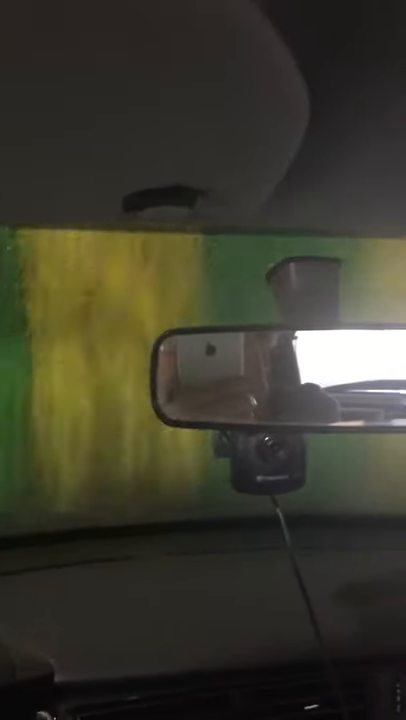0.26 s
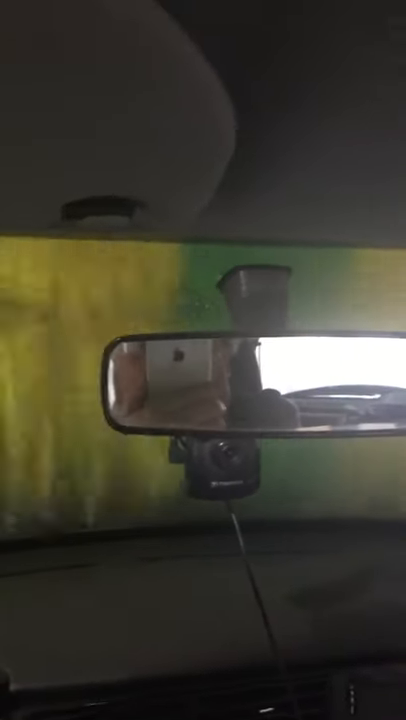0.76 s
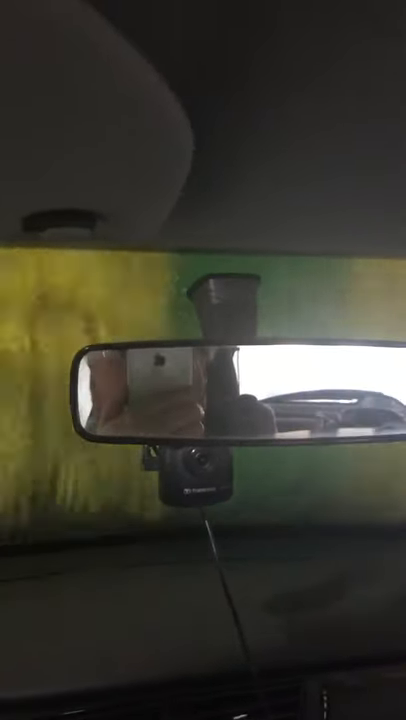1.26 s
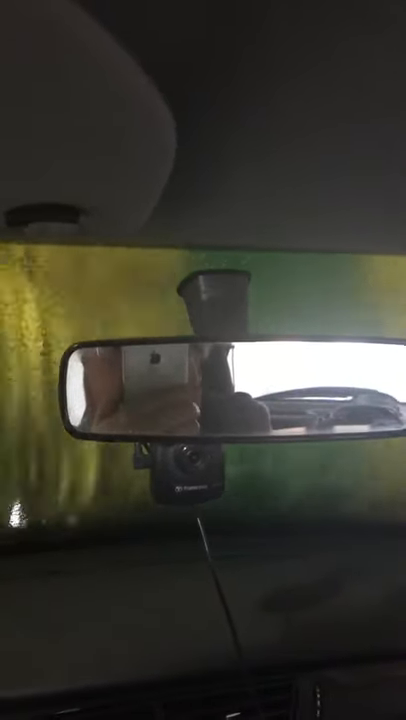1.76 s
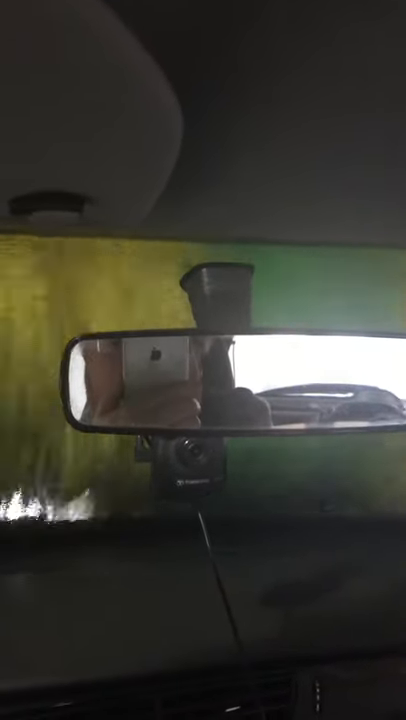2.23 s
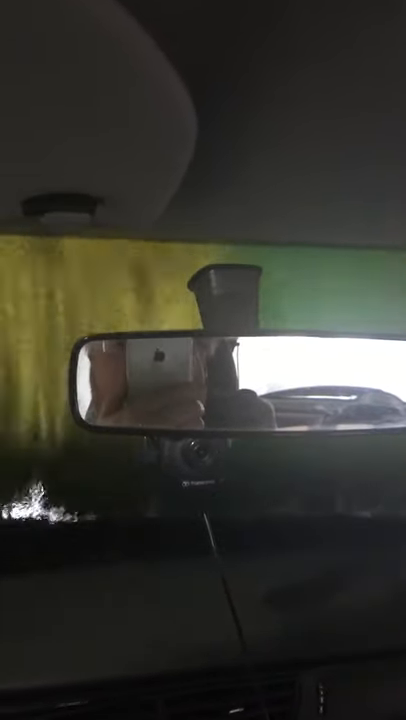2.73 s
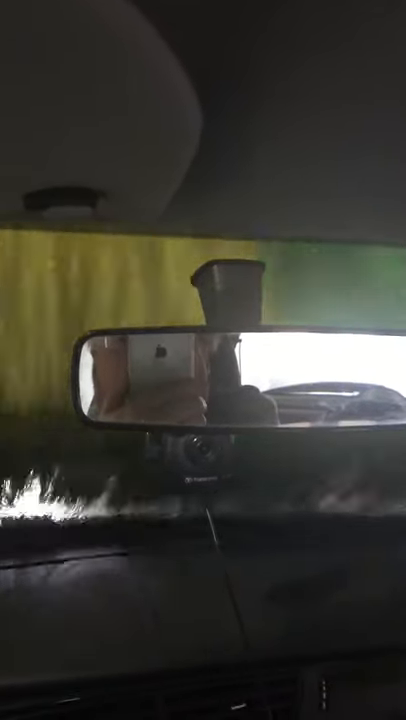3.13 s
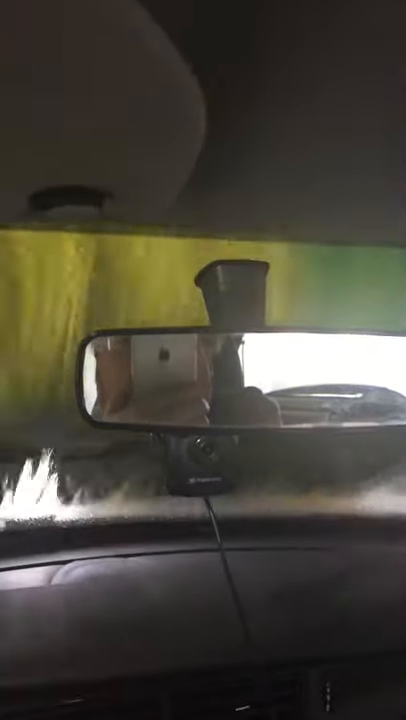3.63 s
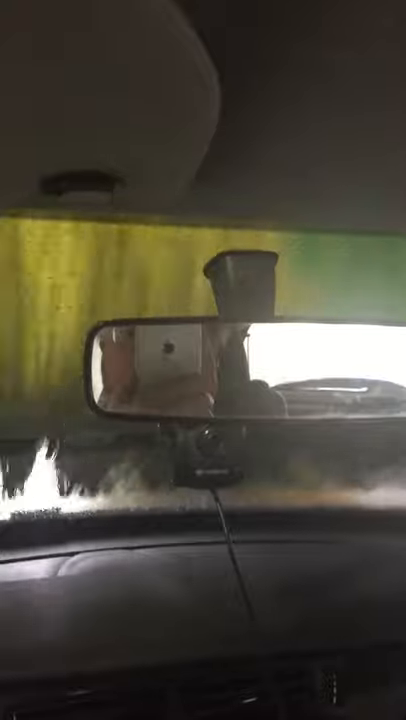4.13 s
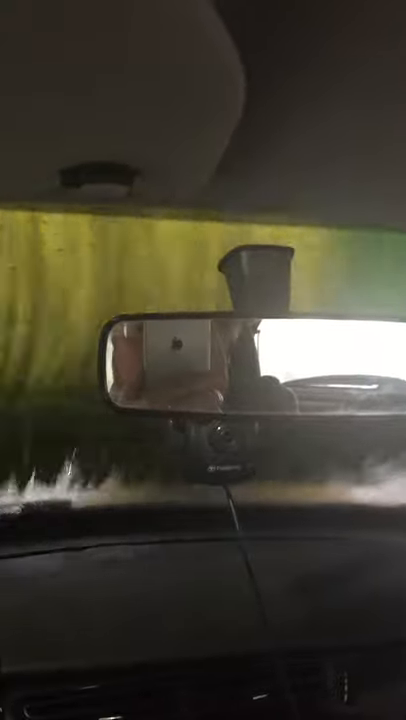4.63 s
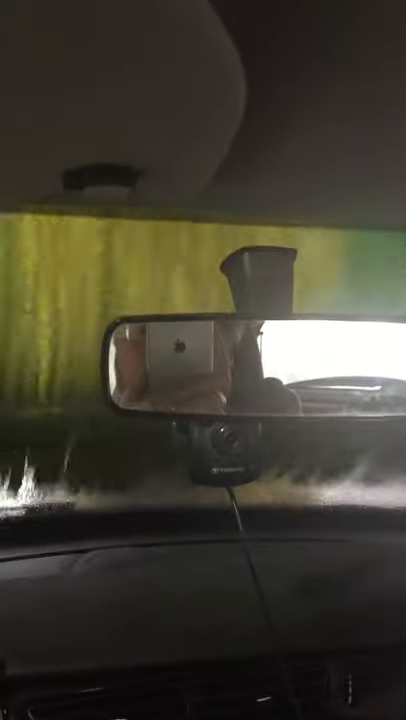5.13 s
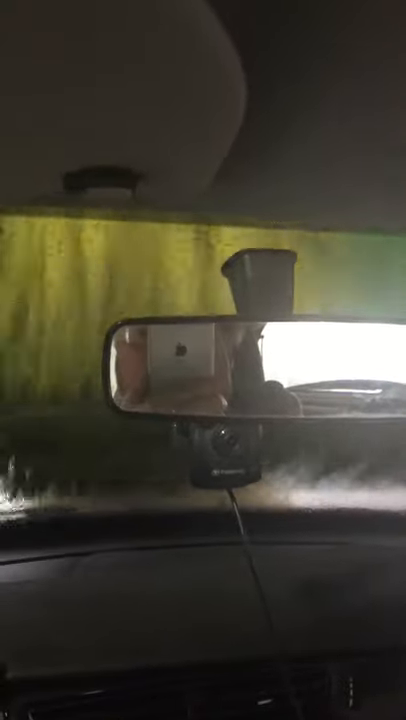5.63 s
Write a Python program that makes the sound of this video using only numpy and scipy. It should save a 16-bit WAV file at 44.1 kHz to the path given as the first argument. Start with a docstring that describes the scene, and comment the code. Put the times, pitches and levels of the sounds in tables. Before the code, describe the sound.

Heard from a front seat in a closed car: low rumble and a faint motor whine, then at about 1.4 seconds a spinning roller's wet strips slap and drum rapidly on the bonnet. Drumming grows deeper, water clicks and hiss build on the glass, and from 3.4 seconds a steady throbbing swish continues with thumps and slaps. Close, boxy, muffled mono sound.

```python
"""Inside a closed car in a wash bay: a spinning roller of wet foam strips lands on the bonnet and climbs the windscreen.
Coloured noise and dense contacts make the drumming, panel slap, swish and water, throbbing with the passing rows.
Noise bursts make slaps, ticks and spurts; decaying sines make thumps; ringing taps make patter, knocks and tinkling.
A faint motor whine precedes and meets the landing; low rumble and droning machinery lie behind. Cabin resonances
colour the noise layers, and a steep low-pass dulls everything."""
import sys
import numpy as np
from scipy import signal
from scipy.fft import rfft, irfft, next_fast_len
from scipy.io import wavfile

SR = 44100
rng = np.random.default_rng(int(sys.argv[2]) if len(sys.argv) > 2 else 0)


def dump_mix(stems):
    """Bounce the given channels to the path in sys.argv[1] as a 16-bit WAV at rate SR."""
    frames = np.atleast_2d(stems).T  # one column per channel
    limited = np.clip(frames, -1, 1)  # hard clip at full scale
    pcm = np.round(limited * 32767).astype(np.int16)
    wavfile.write(sys.argv[1], SR, pcm)


N = 259308

# layer levels before modulation: start_s, shell_drumming_db, glass_swish_db, water_hiss_db
ROLLER_LEVELS = [(0, -33, -49, -74), (.6, -38, -50.5, -71), (.9, -34.5, -50, -70.5),
                 (1.27, -37, -50, -71.5), (1.45, -30, -48, -68), (1.7, -28, -47, -68),
                 (2.08, -24.5, -42.5, -65.5), (2.2, -27, -44, -66), (2.65, -24, -38, -59),
                 (2.74, -27.5, -36, -57), (2.92, -26, -32.5, -51), (3.1, -23.5, -29, -50),
                 (3.33, -25.5, -28.5, -47), (3.365, -25, -30, -51.5), (3.6, -24, -29.5, -51),
                 (4.1, -23.5, -31.5, -55), (4.8, -24, -31, -54.5), (5.88, -24, -31, -54.5)]
# strip rows swept past: time_s, row_count
ROWS_PASSED = [(0, .5), (1.5, 34.53), (1.75, 40.56), (3.0, 69.63), (3.358, 77.45), (4.418, 101.45),
               (5.484, 125.45), (5.88, 134.4)]
CREST_S = 3.37    # the roller gets over the foot of the windscreen


def roller():
    """Strips drum, slap and swish amid water; the layers throb with the rows, most share brief level changes."""
    # relative noise colours: freq_hz, density_db
    shell_colour = [(53, -75), (90, -11.5), (118, -6.5), (145, -1.5), (177, 2), (236, -1.5), (286, -4),
                    (324, -6.5), (373, -12.5), (440, -14.5), (570, -16), (970, -120)]
    panel_colour = [(260, -23), (380, -3), (470, -16), (600, -1.5), (750, -1.5), (900, -4), (1050, -10),
                    (1300, -12), (1800, -16), (2600, -40), (3500, -57)]
    glass_colour = [(700, -4.5), (950, 1.5), (1150, 1.5), (1400, 3.5), (1550, 0), (1800, -1), (2300, -0.5),
                    (2700, -1.5), (3300, -2), (3700, -4), (4100, -9.5), (4500, -15), (5000, -24.5)]
    hiss_colour = [(4100, -19), (4500, 1), (4900, -1.5), (5600, 2.5), (6500, -3.5), (7300, -17.5),
                   (8000, -44)]
    spray_colour = [(6800, -6), (7400, -9.5), (8400, -5.5), (9500, -8), (10000, -8), (11500, -11),
                    (13000, -14), (15000, -18), (16000, -25)]
    crest_ring_colour = [(600, -23), (750, 2), (950, 2), (1100, -12), (1300, -25)]

    shell_db, glass_db, hiss_db = in_time(ROLLER_LEVELS)
    # panels follow the drumming and the swish; fuller on the thin bonnet and at the crest
    panel_db = -46.5 + 0.66 * (shell_db + 34) + 0.4 * (glass_db + 50)
    panel_db += 4.5 * bump(CREST_S, rise_s=0.12, fall_s=0.19)
    panel_db += 3 * bump(1.52, rise_s=0.22, fall_s=1)
    # fine spray follows the hiss, swells before the crest, drops sharply at it
    spray_db = -75.5 + 0.79 * (hiss_db + 71) - 5 * step(CREST_S, length_s=0.018)
    spray_db += 3 * bump(3.2, rise_s=.35, fall_s=.3)
    # beat starts at the landing, evens out slightly on the glass; each layer takes a share
    beat = 1.77 * step(1, length_s=.35) - 0.4 * step(CREST_S, length_s=.1)
    uneven = drift(24)
    change_db = brief_changes(rise_s=0.0073, fall_s=0.0059)

    shell = coloured(rng.standard_normal(N), shell_colour)
    shell *= from_db(shell_db + 0.3 * beat * row_beat(lag_rows=0.053))

    panel = coloured(contacts(per_s=9000, spread_db=2.0), panel_colour)
    panel_beat_db = 0.28 * beat * row_beat(lag_rows=0.028)
    panel *= from_db(panel_db + panel_beat_db + 0.24 * uneven + 0.44 * drift(10.3) + 1.4 * change_db)

    glass = coloured(contacts(per_s=12000, spread_db=2.0), glass_colour)
    glass = patchy(glass, 908, 4500, depth_db=1.18, pole_hz=12.0)
    glass_beat_db = 0.55 * beat * row_beat(lag_rows=0)
    glass *= from_db(glass_db + glass_beat_db + 0.19 * uneven + 0.64 * drift(45) + 1.2 * change_db)

    # hiss and spray are the same droplets; flying water partly fills the dips
    water = contacts(per_s=22000, spread_db=1.8)
    hiss = patchy(coloured(water, hiss_colour), 4400, 7500, depth_db=1.7, pole_hz=21.0)
    hiss_beat_db = 0.53 * beat * row_beat(lag_rows=.02)
    hiss *= from_db(hiss_db + hiss_beat_db + 0.56 * uneven + 0.8 * drift(33) + 0.68 * change_db)

    spray = patchy(coloured(water, spray_colour), 7000, 15000, depth_db=1.6, pole_hz=14.0)
    spray_beat_db = 0.69 * beat * row_beat(lag_rows=.04)
    spray *= from_db(spray_db + spray_beat_db + .3 * uneven + 0.61 * drift(30) + .4 * change_db)

    # upper panel ring peaks just before the crest
    crest_ring = coloured(contacts(per_s=3000, spread_db=1.5), crest_ring_colour)
    crest_ring *= from_db(-30 + change_db) * bump(3.33, rise_s=0.084, fall_s=.08)
    return shell + panel + crest_ring + glass + hiss + spray


def row_beat(lag_rows):
    """Beat of the passing rows: swells slowly, falls faster; swings about zero."""
    turn = 2 * np.pi * (in_time(ROWS_PASSED)[0] - lag_rows)
    return np.cos(turn) + 0.41 * np.sin(2 * turn)


def brief_changes(rise_s, fall_s):
    """Brief level changes in dB, mostly dips: listed ones first, then some recurring each turn of the roller."""
    # brief level changes as the roller works up the bonnet, mostly dips: time_s, change_db (before layer shares)
    bonnet_changes = [(1.465, -4), (1.505, -2), (1.548, 0), (1.628, -1), (1.716, -1), (1.803, -3),
                      (1.84, -3.5), (2.05, -5), (2.126, -7), (2.5, -3), (2.65, -3.5), (2.691, -4.5),
                      (3.309, -6.5)]
    # rows of the turn followed by a brief level change, mostly a dip: row_number
    turn_rows = [1, 5, 6, 8, 10]
    # level change after each of these rows: change_db (before layer shares)
    turn_changes = [-3.5, -7, -3.5, -1, 0.5]
    rows_per_turn, phase_rows = 12, .45

    s, rows = np.transpose(ROWS_PASSED)
    events = list(bonnet_changes)
    for first, db in zip(turn_rows, turn_changes):
        for row in np.arange(first, rows[-1], rows_per_turn):
            at_s = np.interp(row + phase_rows, rows, s)
            if at_s > bonnet_changes[-1][0]:
                events.append((at_s, db))
    return sum(db * bump(at_s, rise_s, fall_s) for at_s, db in events)


def thumps():
    """Bunches of strips thump the shell: a few sine cycles that swell and die."""
    # blows: start_s, envelope_peak_db, pitch_hz
    blows = [(1.52, -23, 185), (1.609, -17.5, 149), (1.677, -17, 187), (1.733, -13, 171), (1.78, -17, 182),
             (1.89, -17.5, 170), (2.064, -15, 164), (2.089, -16.5, 194), (2.487, -21, 175),
             (3.093, -20, 171), (3.208, -22, 177), (3.455, -22, 256), (3.604, -13.5, 184),
             (3.745, -18.5, 220), (3.99, -15, 195), (4.435, -16.5, 202), (4.597, -16, 141),
             (4.888, -18, 184), (5.136, -14.5, 154), (5.287, -18.5, 214), (5.416, -11, 196)]
    swell_s = 0.0048
    out = np.zeros(N + SR)
    s = np.arange(SR // 10) / SR
    shape = s / swell_s * np.exp(1 - s / swell_s)
    for at_s, db, hz in blows:
        out[round(at_s * SR):][:len(s)] += from_db(db) * shape * np.sin(2 * np.pi * hz * s)
    return out[:N]


def slaps():
    """Rows landing flat smack the sheet metal: a dull noise body and a brighter crack."""
    # smacks: start_s, body_level_db, crack_relative_db
    smacks = [(1.353, -35.5, -3), (1.470, -28, -12), (1.519, -36, -3), (1.554, -27.5, -9), (1.58, -37, -2),
              (1.607, -33, -14), (1.633, -30, -4), (1.675, -29.5, -6), (1.723, -27, -9), (1.762, -30, -5),
              (1.809, -30.5, -7), (1.86, -29, -13), (1.895, -35, -8), (1.988, -33, -10), (2.019, -28, -14),
              (2.067, -30, -16), (2.139, -28, -9), (2.232, -27, -16), (3.684, -35, -3), (3.902, -30, -7),
              (4.431, -32, -2), (4.966, -25, -7), (5.026, -26, -9), (5.109, -28, -3), (5.145, -20, -7),
              (5.492, -30, 1), (5.797, -24, -4)]
    dull = bursts([(s, db) for s, db, crack in smacks], 370, 920, t60_s=0.092, attack_s=.0004)
    crack = bursts([(s, db + crack) for s, db, crack in smacks], 960, 2200, t60_s=0.09, attack_s=.0008)
    return dull + crack


def patter():
    """Loose strip ends patter on the bonnet: dense random dull taps that bunch with the rows."""
    on = step(1.37, length_s=0.33) - step(2.2, length_s=0.33)
    taps = pings(600, 3.0, low_hz=495, high_hz=2260, t60_cycles=31.0, tilt_db=-2.0)
    return on * from_db(-43 + 3.0 * row_beat(lag_rows=.03)) * taps


def knocks():
    """Clumps of strip ends rap the windscreen; ringing taps whose level follows the swish."""
    level_db = in_time(ROLLER_LEVELS)[1] - 10 + 3.5 * drift(11)
    taps = pings(500, 2.9, low_hz=1020, high_hz=3460, t60_cycles=17.0, tilt_db=-0.07)
    return from_db(level_db) * step(CREST_S, length_s=.6) * taps


def ticks():
    """Drops and strip ends on the glass: a bright click, a duller knock under it and a thin top."""
    # clicks: start_s, bright_level_db, knock_relative_db, top_relative_db
    clicks = [(2.3248, -51, 11, -25), (2.606, -41, 1, -22), (2.6963, -41.5, 13.5, -22),
              (2.764, -48, 10, -25), (2.9025, -39, 8, -22), (2.9218, -35.5, 8, -18), (2.9474, -41, -1, -22),
              (2.972, -34, 5, -20), (3.0174, -40, -2, -14), (3.057, -40, 12, -11), (3.109, -33, -1, -28),
              (3.2094, -38, 0, -16), (3.245, -22, -5, -10), (3.2614, -39, -4, -12), (3.278, -42, 0, -10),
              (3.3107, -39, 16, -10), (3.331, -37, 0, -18), (3.346, -37, 5, -12)]
    bright = bursts([(s, db) for s, db, low, top in clicks], 3700, 9000, t60_s=0.015)
    knock = bursts([(s, db + low) for s, db, low, top in clicks], 2400, 4300, t60_s=0.026)
    thin = bursts([(s, db + top) for s, db, low, top in clicks], 9000, 16500, t60_s=.011)
    return bright + knock + thin


def tinkling():
    """Fine tinkling in the treble: random high rings whose level follows the water hiss."""
    level_db = in_time(ROLLER_LEVELS)[2] - 6.5
    return from_db(level_db) * pings(400, 1.8, low_hz=4600, high_hz=12500, t60_cycles=87.0, tilt_db=-1.57)


def splashes():
    """Spurts of water on the glass: soft bright noise bursts while the water builds."""
    # spurts: start_s, level_db
    spurts = [(1.475, -64), (1.64, -63), (1.725, -63), (1.765, -64), (1.812, -63), (1.85, -58),
              (1.897, -59), (1.975, -59), (2.03, -58), (2.062, -59), (2.085, -61), (2.14, -61),
              (2.235, -56), (2.28, -59), (2.325, -56), (2.42, -57), (2.51, -59), (2.70, -51), (2.78, -55),
              (2.84, -53)]
    return bursts(spurts, 4500, 9500, t60_s=0.12, attack_s=.004)


def motor():
    """Thin sine tones that fade in and out, wavering in level and a little in pitch."""
    # spells of whine: start_s, end_s, pitch_hz, level_db
    spells = [(-.1, .2, 865, -54), (0.57, 1.042, 868, -53.5), (0.733, 0.897, 536, -51),
              (.94, 1.04, 519, -50)]
    fade_s = 0.066
    out = np.zeros(N)
    for start_s, end_s, hz, db in spells:
        amplitude = np.sqrt(2) * from_db(db + 0.7 * drift(6.8))
        on = step(start_s, fade_s) - step(end_s, fade_s)
        phase = 2 * np.pi * np.cumsum(hz + 1.4 * drift(4.9)) / SR
        out += amplitude * on * np.sin(phase)
    return out


def rumble():
    """Low rumble in three noise bands, each with its own uneven level."""
    # band levels: time_s, low_db, boom_db, upper_db
    band_levels = [(0, -44, -43, -59), (.67, -51, -42, -51), (1.19, -46, -40, -52.5),
                   (1.6, -47, -37.5, -40.5), (2.0, -38.5, -31.5, -42.5), (2.2, -39, -33.5, -57),
                   (2.45, -41, -29, -34), (2.7, -34, -36, -34), (2.95, -40, -24, -47),
                   (3.15, -35.5, -33, -37), (3.4, -42, -29, -38.5), (3.75, -40, -44.5, -42),
                   (4.3, -40.5, -33.5, -40), (4.45, -41, -36, -39.5), (4.8, -37, -44, -35),
                   (5.15, -40, -29, -38), (5.35, -45, -41.5, -39), (5.55, -38, -28, -39),
                   (5.88, -38, -47, -47)]
    # relative noise colours: freq_hz, density_db
    low_colour = [(15, -39), (25, -30), (33, -20.5), (42, -10), (52, -3), (70, -5), (88, 2.5), (110, -41)]
    boom_colour = [(95, -25), (112, -0.5), (127, -5), (140, -7), (160, -38.5)]
    upper_colour = [(320, -33), (350, 7), (382, 13.5), (415, 0.5), (450, -18)]
    low_db, boom_db, upper_db = in_time(band_levels)
    low = coloured(rng.standard_normal(N), low_colour) * from_db(low_db)
    boom = coloured(rng.standard_normal(N), boom_colour) * from_db(boom_db)
    upper = coloured(rng.standard_normal(N), upper_colour) * from_db(upper_db)
    return low + boom + upper


def windscreen_ring():
    """A narrow noise band: the windscreen rings as the roller rides it."""
    # relative noise colour: freq_hz, density_db
    screen_colour = [(1150, -17), (1270, -1), (1340, 5), (1430, -4), (1550, -27)]
    return coloured(rng.standard_normal(N), screen_colour) * from_db(-46) * step(CREST_S, length_s=0.94)


def machinery():
    """Bay machinery drones behind the glass: a noise band that grows as the roller draws near."""
    # relative noise colour: freq_hz, density_db
    drone_colour = [(170, -26), (220, -1), (260, -1), (320, -7.5), (370, -12)]
    level_db = -48.5 + 9.5 * step(0.64, length_s=0.39)
    return coloured(rng.standard_normal(N), drone_colour) * from_db(level_db)


def coloured(x, spectrum):
    """Shape a signal by a spectrum and the resonances of shell and cabin; rms 1."""
    # resonances: centre_hz, width_hz, lift_db
    resonances = [(55.5, 7.6, 4), (128.6, 36, 4.5), (161.5, 56, 2.5), (199, 21, 1.5), (279.2, 23, 4.5),
                  (531, 110, 5.5), (661.6, 20, 5), (1318, 65, 4), (351, 28, 3.5), (431, 64, 2.5),
                  (2026, 87, 3.5), (2990, 450, 3), (3400, 42, 5.5), (6650, 270, 3.5), (10470, 500, -9.5)]
    size = next_fast_len(N)
    hz = np.arange(1, size // 2 + 2) * SR / size
    points = np.array(spectrum)
    level_db = np.interp(np.log(hz), np.log(points[:, 0]), points[:, 1], left=-120, right=-120)
    for centre_hz, width_hz, lift_db in resonances:
        level_db = level_db + lift_db / (1 + (2 * (hz - centre_hz) / width_hz) ** 2)
    return rms_one(irfft(rfft(x, size) * from_db(level_db), size)[:N])


def contacts(per_s, spread_db):
    """Random impulses of either sign and uneven size: many small contacts of strip and water; rms 1."""
    sizes = from_db(spread_db * np.minimum(rng.exponential(1, N), 5)) * rng.choice([-1, 1], N)
    return rms_one(sizes * (rng.random(N) < per_s / SR))


def patchy(x, low_hz, high_hz, depth_db, pole_hz):
    """Third-octave slices of a signal swell and sink each on their own; rms 1."""
    spectrum = rfft(x)
    hz = np.arange(len(spectrum)) * SR / N
    place = 3 * np.log2(np.clip(hz, low_hz, high_hz) / low_hz)
    out = 0
    for k in range(int(place[-1]) + 2):
        piece = irfft(spectrum * np.clip(1 - abs(place - k), 0, 1), N)
        out = out + piece * from_db(depth_db * drift(pole_hz))
    return rms_one(out)


def bursts(rows, low_hz, high_hz, t60_s, attack_s=.0003):
    """Each event is a short band of noise that starts quickly and dies away."""
    marks = np.zeros(N)
    for s, level_db in rows:
        marks[round(s * SR)] = from_db(level_db)
    soft = np.exp(-1 / (attack_s * SR))
    decay = signal.lfilter([1], [1, -from_db(-60 / (t60_s * SR))], marks + 1e-18)
    envelope = signal.lfilter([1 - soft], [1, -soft], decay)
    band = signal.butter(4, [low_hz, high_hz], "band", fs=SR, output="sos")
    share = 2 * (high_hz - low_hz) / SR      # part of the noise power that the band lets through
    return signal.sosfilt(band, envelope * rng.standard_normal(N)) / np.sqrt(2 * share)


def pings(per_s, spread_db, low_hz, high_hz, t60_cycles, tilt_db):
    """Random taps, each ringing at one of twelve pitches, tilted in dB per pitch; rms 1."""
    clicks = contacts(per_s, spread_db)
    dealt = rng.integers(0, 12, N)
    out = 0
    for k, hz in enumerate(np.geomspace(low_hz, high_hz, num=12)):
        r = from_db(-60 * hz / (t60_cycles * SR))
        w = 2 * np.pi * hz / SR
        ring = signal.lfilter([0, np.sin(w)], [1, -2 * r * np.cos(w), r * r], clicks * (dealt == k) + 1e-18)
        out = out + from_db(tilt_db * k) * ring
    return rms_one(out)


def drift(pole_hz):
    """Slow random wander: noise at SR / 20 through two equal one-pole low-passes, run in; spread 1."""
    r = np.exp(-40 * np.pi * pole_hz / SR)
    slow = signal.lfilter([1], [1, -2 * r, r * r], rng.standard_normal(N // 20 + 2002))[2000:]
    return np.interp(np.arange(N) / 20, np.arange(len(slow)), rms_one(slow))


def in_time(rows):
    """Columns of a curve table, one value a sample."""
    s, *columns = np.transpose(rows)
    return [np.interp(np.arange(N) / SR, s, c) for c in columns]


def step(at_s, length_s):
    """Goes smoothly from 0 to 1 about a moment."""
    return .5 + .5 * np.tanh(2 * (np.arange(N) / SR - at_s) / length_s)


def bump(at_s, rise_s, fall_s):
    """A bell of height 1 with its own rise and fall."""
    s = np.arange(N) / SR - at_s
    return np.exp(-(s / np.where(s < 0, rise_s, fall_s)) ** 2)


def from_db(db):
    """Gain of a level in dB."""
    return 10 ** (np.asarray(db) / 20)


def rms_one(x):
    """Scale to rms 1."""
    return x / np.sqrt(np.mean(x ** 2) + 1e-20)


def scene():
    """Sum of all sources as heard from a front seat, one channel."""
    strips = roller() + thumps() + slaps() + patter() + knocks()
    water = ticks() + tinkling() + splashes()
    background = motor() + rumble() + windscreen_ring() + machinery()
    return (strips + water + background)[None]


def record(dry):
    """Steep elliptic low-pass: 0.3 dB ripple, 70 dB stopband, edge at 15.7 kHz."""
    return signal.sosfilt(signal.ellip(10, .3, 70, 15700, fs=SR, output="sos"), dry)


dry = scene()
out = record(dry)
dump_mix(out)
```